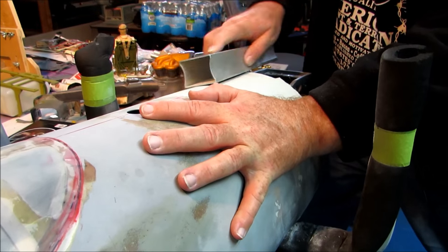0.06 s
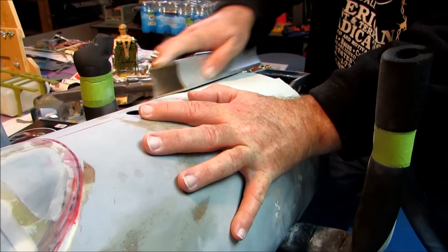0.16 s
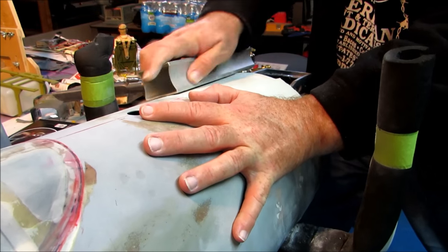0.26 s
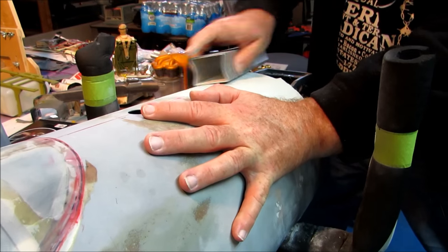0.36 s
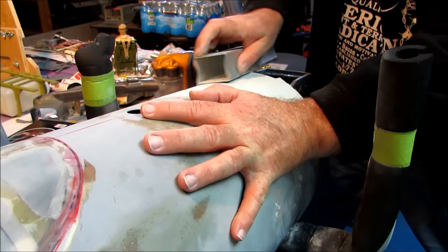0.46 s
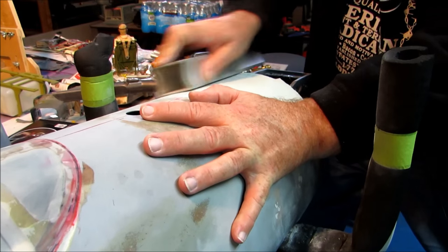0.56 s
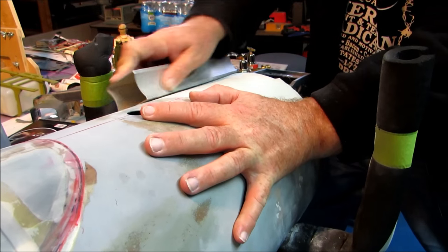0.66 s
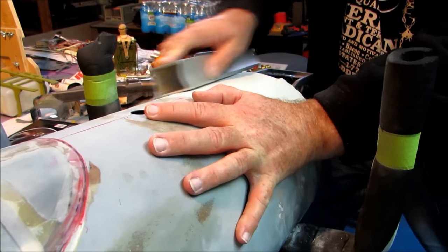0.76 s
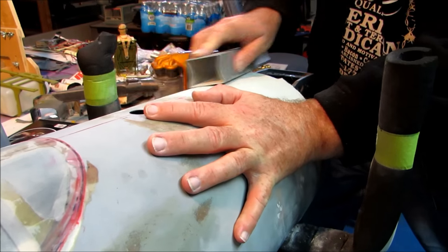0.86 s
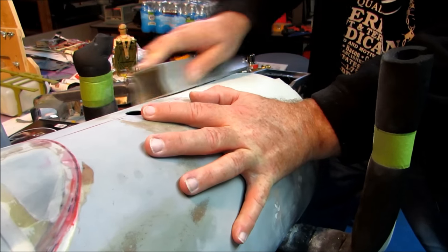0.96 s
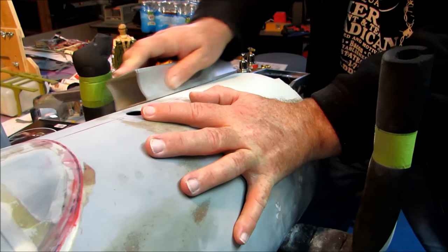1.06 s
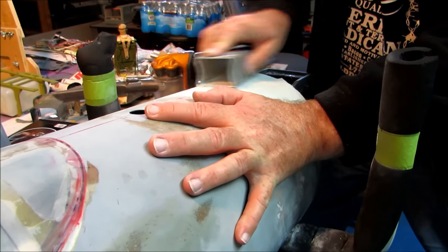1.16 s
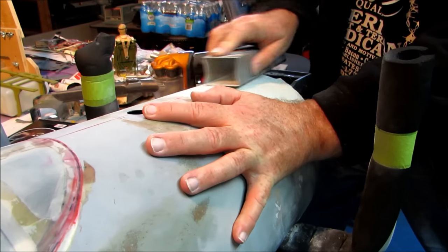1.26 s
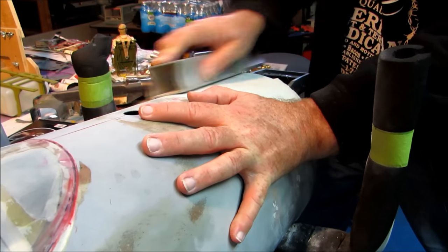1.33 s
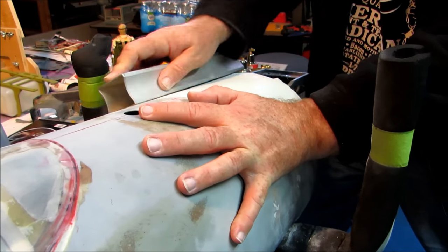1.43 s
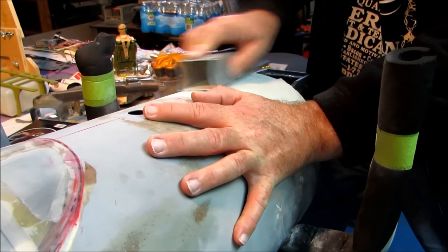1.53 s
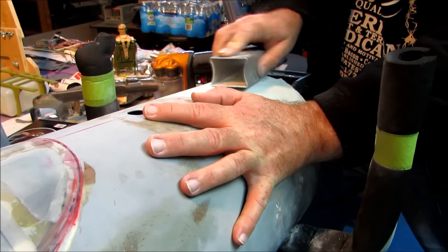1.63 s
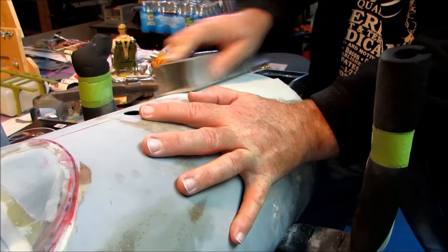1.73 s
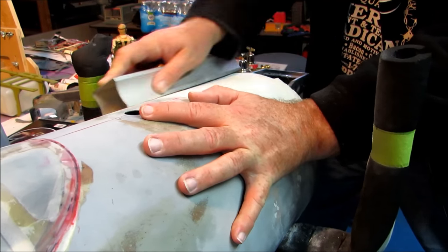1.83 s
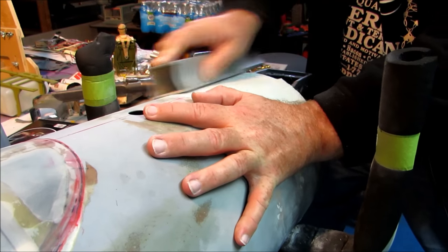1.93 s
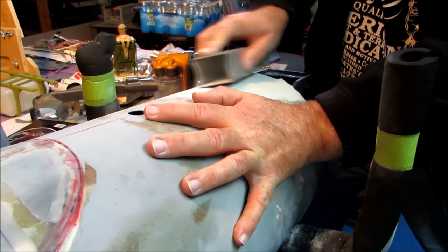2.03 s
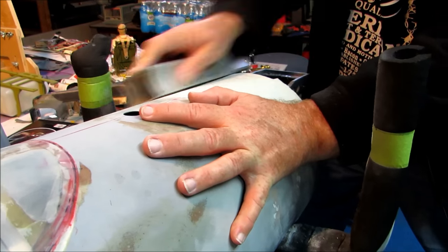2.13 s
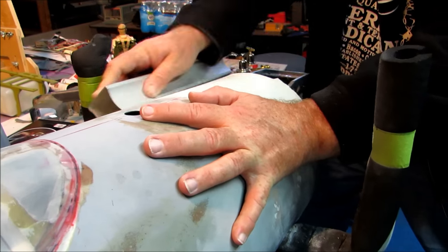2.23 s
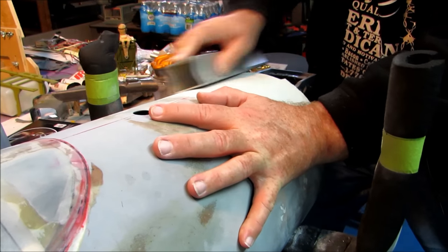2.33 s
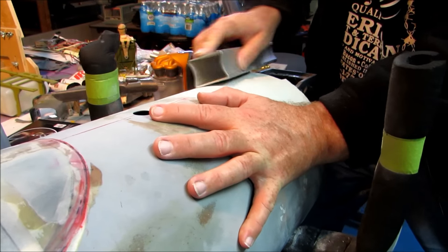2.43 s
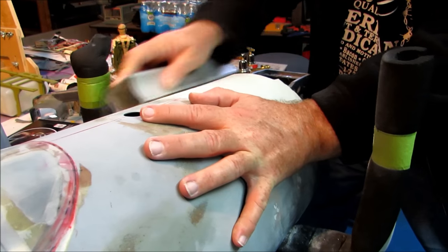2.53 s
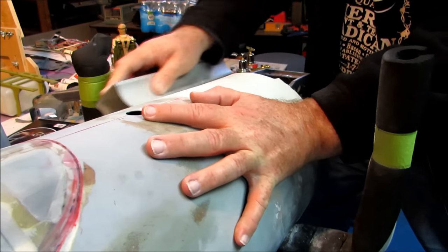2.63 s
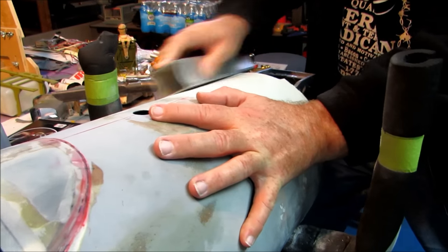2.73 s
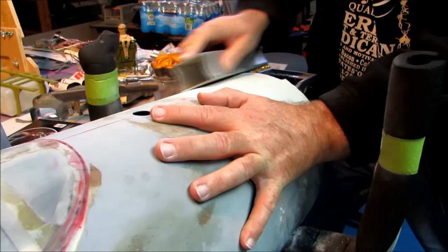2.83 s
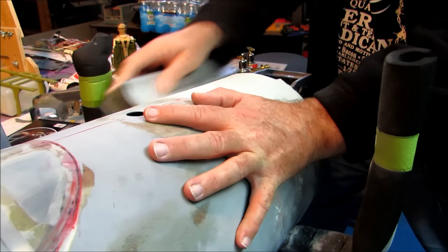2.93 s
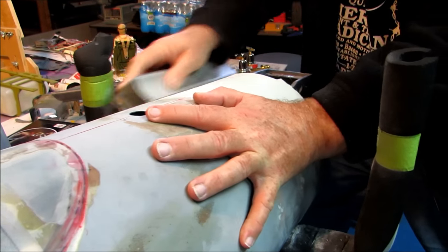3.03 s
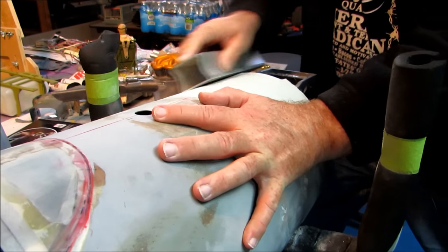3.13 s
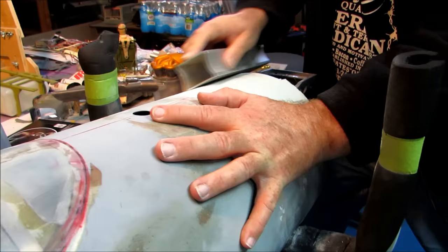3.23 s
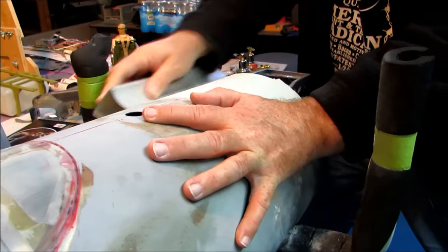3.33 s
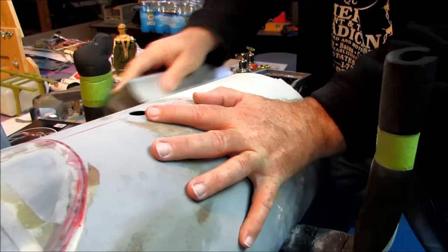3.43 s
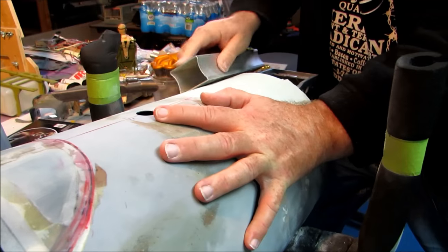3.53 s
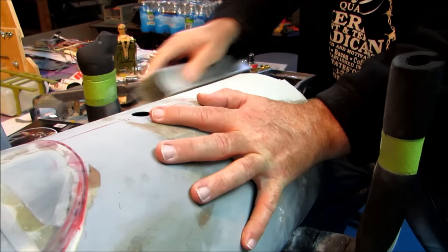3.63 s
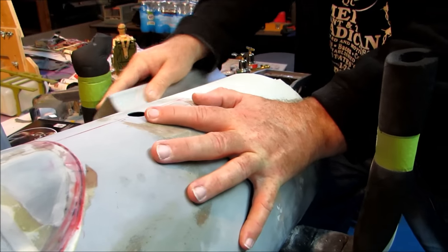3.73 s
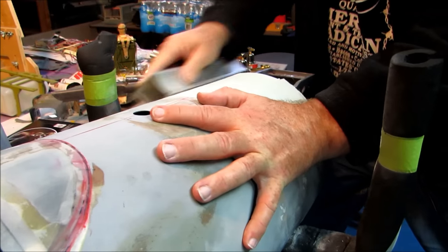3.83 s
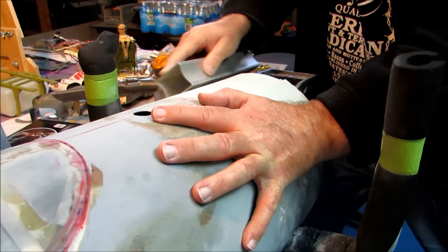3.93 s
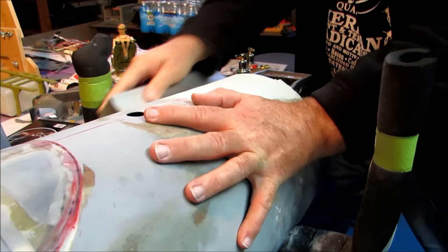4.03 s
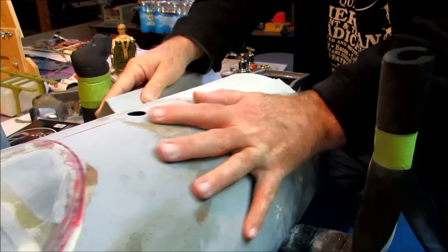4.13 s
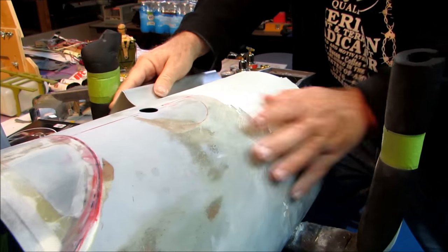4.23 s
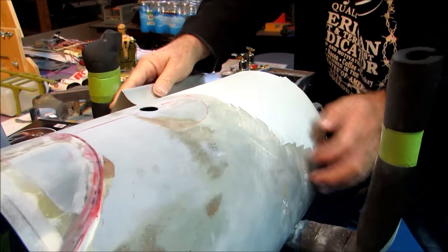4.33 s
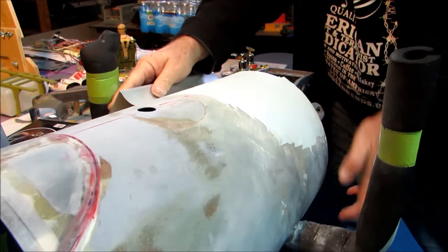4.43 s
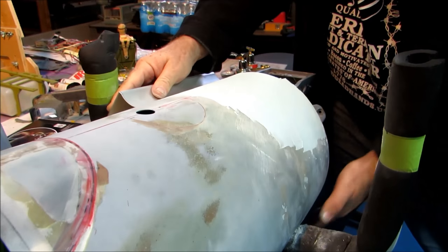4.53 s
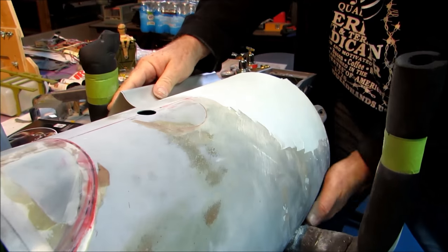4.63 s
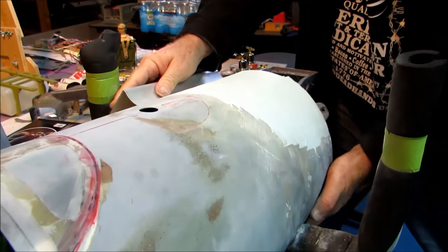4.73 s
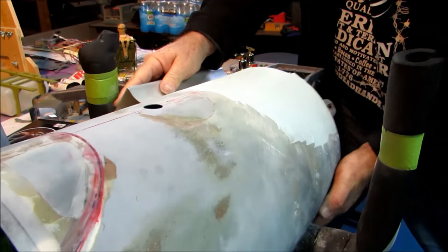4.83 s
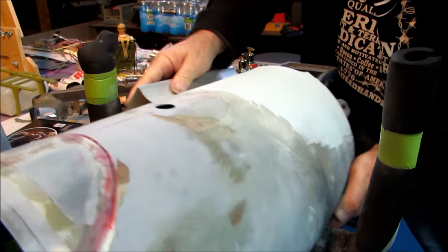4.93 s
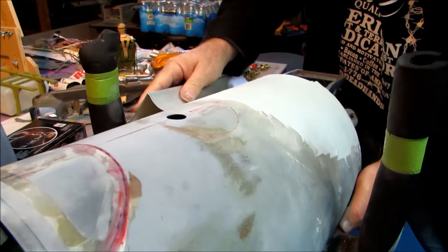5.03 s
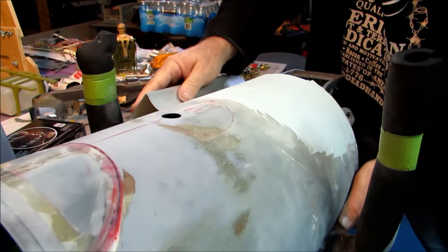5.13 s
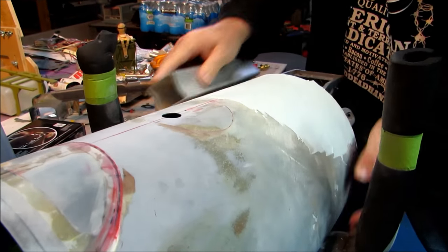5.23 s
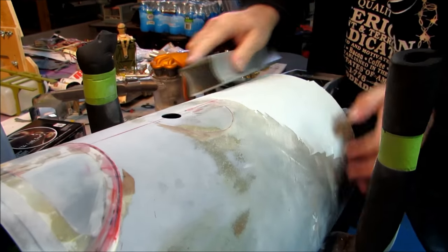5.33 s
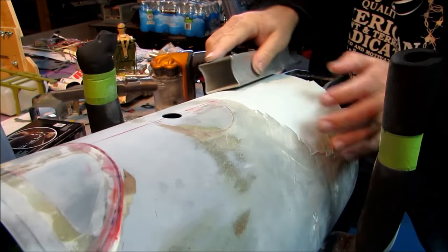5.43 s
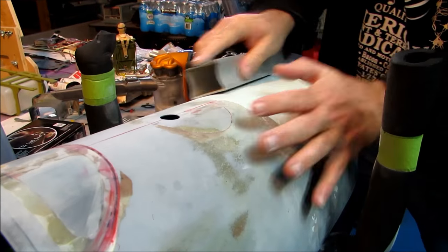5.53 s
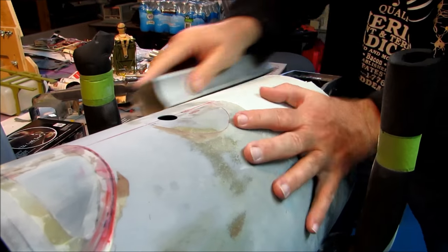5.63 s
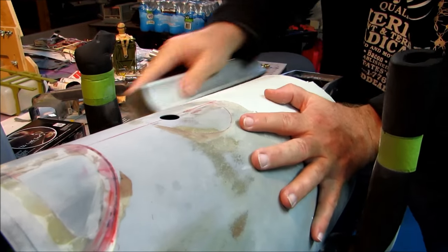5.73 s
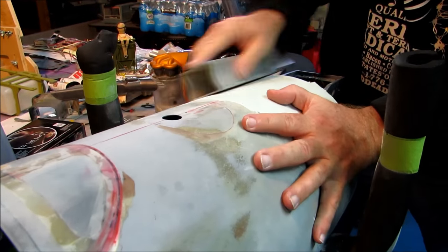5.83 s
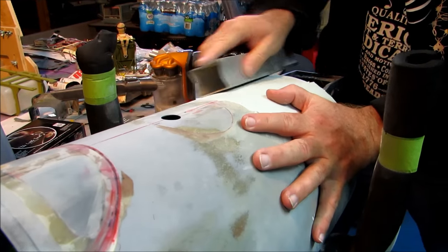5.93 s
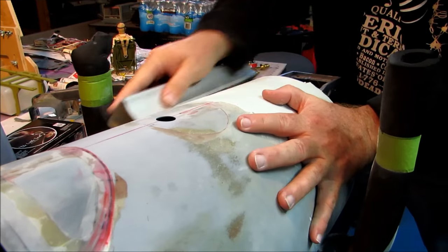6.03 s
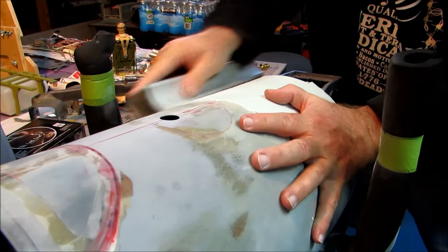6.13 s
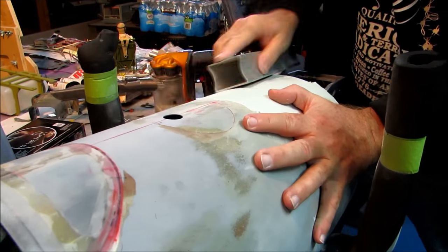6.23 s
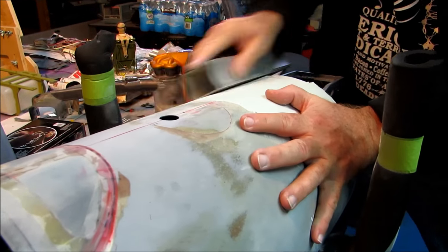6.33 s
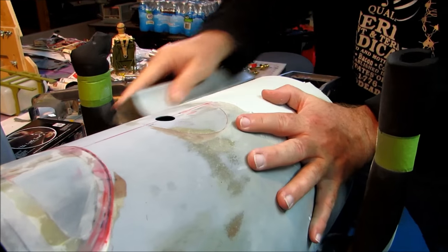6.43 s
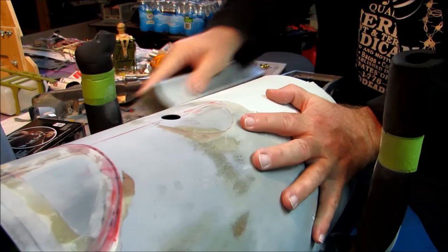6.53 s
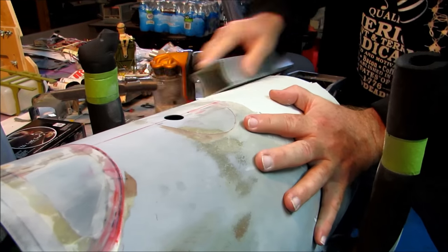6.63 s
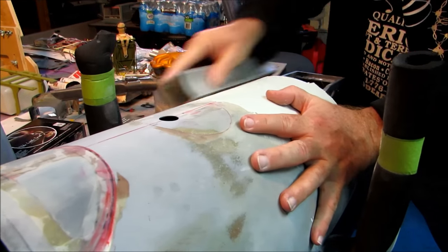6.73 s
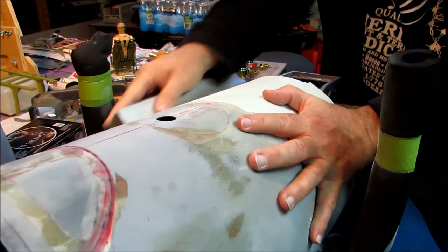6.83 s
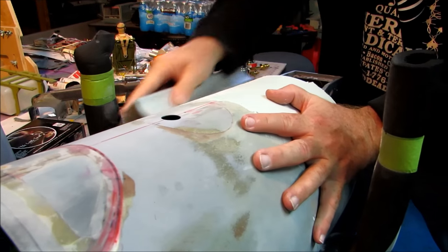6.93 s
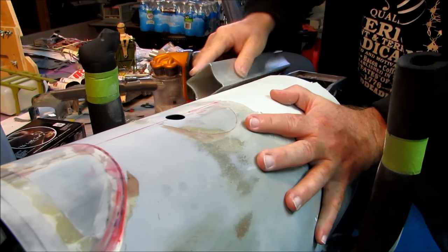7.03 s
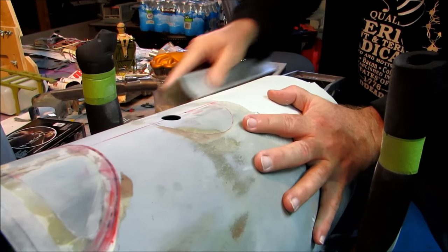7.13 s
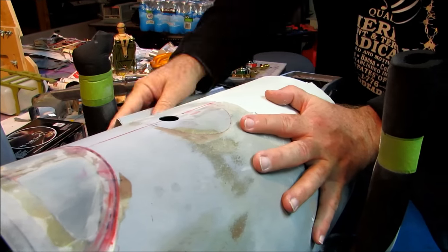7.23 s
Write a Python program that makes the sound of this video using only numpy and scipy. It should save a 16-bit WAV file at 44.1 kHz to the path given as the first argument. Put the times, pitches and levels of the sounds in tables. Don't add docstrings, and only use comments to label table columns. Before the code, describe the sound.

Fast, dry, even sanding strokes on a hollow shell, with a quiet shuffling break and a hollow knock before the scrubbing resumes in a workshop.

```python
import sys
import numpy as np
from scipy import signal
from scipy.fft import rfft, irfft, next_fast_len
from scipy.io import wavfile
from scipy.ndimage import uniform_filter1d

SR = 44100
rng = np.random.default_rng(int(sys.argv[2]) if len(sys.argv) > 2 else 0)


def output_pcm(signal):
    pcm = np.clip(np.atleast_2d(signal).T, -1, 1) * 32767
    wavfile.write(sys.argv[1], SR, np.round(pcm).astype(np.int16))


def field_ratio(decibels):
    return 10 ** (np.asarray(decibels, dtype=float) / 20)


N = 320607

# (turn time [s], speed [dB], pressure [dB], lean toward the end [dB], rest level at the turn [dB])
PUSHES = [(-0.1, -20.5, -22.5, 7, -30), (0.303, -20.5, -22, 4, -43.5), (0.732, -19, -21, -7.5, -39),
          (1.088, -19.5, -20.5, -10.5, -33.5), (1.49, -20, -20.5, -7, -32), (1.887, -19, -18.5, -6.5, -31),
          (2.271, -18.5, -19, -1, -33), (2.669, -19.5, -21, -4.5, -37.5), (3.045, -19.5, -21, 4.5, -38),
          (3.429, -19.5, -21.5, 2.5, -38), (3.797, -21, -22.5, -6.5, -36), (5.772, -17, -19.5, -5, -33),
          (6.138, -17.5, -21, -6.5, -35.5), (6.539, -17, -20, 1.5, -35.5), (6.93, -19, -20.5, -4.5, -36)]
# (turn time [s], speed [dB], pressure [dB], lean toward the end [dB], rest level at the turn [dB])
PULLS = [(0.089, -23.5, -22.5, 3, -38.5), (0.484, -17, -18.5, 2.5, -36), (0.901, -17.5, -19, 8, -35),
         (1.277, -19, -18, 9, -32), (1.676, -18, -17, 11, -34.5), (2.071, -17, -17, 5.5, -36),
         (2.463, -16.5, -18, -6, -37.5), (2.852, -17, -19.5, -1.5, -39), (3.234, -17.5, -20, 0, -39),
         (3.605, -17.5, -20, 8, -37.5), (3.97, -18.5, -19, 5, -39.5), (5.536, -16.5, -18, 4, -47.5),
         (5.953, -15.5, -19, 2, -39.5), (6.336, -16, -19.5, 4, -41), (6.728, -16, -18, 8, -36),
         (7.128, -19, -19.5, 13, -37)]
# (time [s], peak [dB], ring [Hz], length [s])
BUMPS = [(0.379, -21.5, 237, 0.034), (0.637, -25, 248, 0.035), (0.782, -18, 292, 0.033),
         (1.015, -20.5, 274, 0.018), (1.16, -21, 400, .03), (1.33, -21, 540, .03), (1.22, -24, 540, .03),
         (1.129, -21.5, 269, 0.048), (1.29, -28.5, 260, 0.03), (1.41, -15.5, 250, 0.022),
         (1.546, -14.5, 250, 0.024), (1.75, -21, 780, .025), (1.787, -13, 259, 0.024),
         (1.82, -20, 742, 0.027), (2.09, -25.5, 264, 0.033), (2.338, -26, 255, 0.029),
         (2.607, -24, 257, 0.021), (2.63, -29.5, 165, 0.032), (3.751, -17, 312, 0.016),
         (3.86, -22, 250, 0.037), (4.016, -20.5, 250, 0.026), (4.092, -15.5, 313, 0.037),
         (4.228, -24.5, 358, 0.024), (4.662, -36.5, 250, 0.028), (5.113, -41.5, 257, 0.037),
         (5.421, -35, 260, 0.02), (5.907, -25, 274, 0.023), (5.988, -21, 288, 0.017),
         (6.373, -29, 277, 0.03), (6.954, -19, 310, 0.025), (7.21, -20, 780, .025),
         (7.18, -27.5, 169, 0.022), (7.25, -16, 480, 0.02), (7.237, -17, 283, 0.03)]
# (time [s], peak [dB], ring [Hz], length [s])
SNAGS = [(0.533, -21, 1100, 0.018), (1.05, -16, 791, 0.018), (1.105, -18, 956, 0.018),
         (1.407, -12, 767, 0.018), (1.508, -17, 673, 0.018), (1.788, -15, 1090, 0.018),
         (1.899, -17, 912, 0.018), (1.976, -15, 1080, 0.018), (2.089, -23, 1080, 0.018),
         (2.408, -21, 794, 0.018), (2.493, -19, 980, 0.018), (2.595, -19, 923, 0.018),
         (2.873, -22, 991, 0.018), (2.981, -16, 842, 0.018), (3.161, -20, 982, 0.018),
         (3.251, -25, 991, 0.018), (3.75, -17, 1080, 0.018), (3.861, -21, 1030, 0.018),
         (3.994, -22, 1000, 0.018), (4.088, -17, 966, 0.018),
         (5.687, -15, 840, 0.018), (5.799, -16, 1020, 0.018), (6.073, -19, 746, 0.018),
              (6.167, -19, 1050, 0.018), (6.45, -19, 764, 0.018), (6.807, -17, 829, 0.018),
              (6.878, -16, 853, 0.018), (6.946, -19, 910, 0.018), (7.14, -26, 910, 0.018)]
# (time [s], peak [dB])
BITES = [(1.1019, -24), (1.509, -11.5), (1.9061, -24), (2.0892, -18), (2.4904, -16), (4.3495, -48),
         (4.5964, -47), (5.1961, -37), (6.9426, -18), (7.1382, -23)]
# (time [s], looseness [dB])
SLACK = [(0, 6.5), (.4, 4), (1.2, 0.5), (2, -0.5), (3.2, -2), (4.2, 3), (5.5, -1.5), (6.3, -0.5),
         (7.27, -3.5)]
# (frequency [Hz], level [dB])
PAPER = [(2500, -46), (3600, -19), (4400, -1.5), (7000, -1.5), (9500, -2.5), (12500, -2), (13400, -7),
         (14400, -10), (14700, -17), (15400, -36)]
# (frequency [Hz], width [Hz], level [dB])
BLOCK = [(1064, 110, -1), (1333, 524, -5.5), (1623, 258, 0.5), (1984, 406, -2), (2400, 350, 0),
         (2737, 272, -1.5), (3443, 654, -6.5)]
# (frequency [Hz], width [Hz], level [dB])
SHELL = [(250, 50, -0.5), (345, 95, 0), (448, 65, 2), (537, 58, 2), (707, 121, 1.5), (808, 91, 2),
         (937, 156, 0)]
# (frequency [Hz], width [Hz], level [dB])
SWAY_MODES = [(96.4, 23, -11), (173.4, 21, -2.5)]
# (frequency [Hz], gain [dB])
BASS_CUT = [(30, -26), (70, -5), (100, -5.5), (122, -6.5), (170, 0.5), (200, -3.5), (230, 0)]
# (time [s], 20 dB decay [s], block [dB], paper re block [dB], shell re block [dB])
TOUCHES = [(4.207, 0.12, -25, -3.5, -6), (4.346, 0.07, -51, 11, 1), (4.659, 0.07, -40, -6, -5),
           (4.745, 0.2, -44, -14, -3.5), (5.197, 0.1, -39, -13, -4), (5.42, 0.3, -29, -20.5, -3.5)]
# (middle [s], half length [s], block [dB], paper re block [dB], shell re block [dB])
RUBS = [(4.28, .025, -35, -8, -6), (4.595, .02, -52, -12, -6), (4.19, .03, -32.5, -8, -3),
        (4.368, 0.029, -51, 9, 0), (5.02, .06, -58, 2, -3), (4.866, .11, -42, -4, -9),
        (5.102, .05, -56, -12, 5.5), (5.2, .07, -51, 2, -2), (5.228, 0.042, -32.5, -19, -6),
        (5.475, 0.026, -33, -29, 7)]
# (time [s], peak [dB], ring [Hz], length [s])
TAPS = [(4.208, -24, 1550, .012), (4.212, -30, 3400, .012), (4.438, -48, 530, .015),
        (4.695, -40, 447, .025), (4.745, -42, 1600, .015), (4.89, -44, 1130, .015), (5.181, -38, 396, .012),
        (5.197, -34, 1090, .01), (5.223, -29, 1090, .01), (5.224, -35, 2400, .015), (5.42, -27, 813, .006),
        (5.491, -19, 310, .014)]
# (frequency [Hz], width [Hz], level [dB])
SCUFF = [(700, 110, -5), (880, 120, -3), (1110, 160, -1), (1320, 110, -3), (1560, 180, 0), (2050, 260, -5),
         (2420, 200, -2.5), (2950, 400, -9), (3450, 500, -11)]
# (frequency [Hz], level [dB], t60 [s])
KNOCK = [(169, -9, 0.09), (269, -10, 0.15), (352, -10.5, 0.15), (453, -9, 0.08), (550, 7, 0.087),
         (650, -15, .06), (770, -16, .08), (1105, -7, 0.067), (1570, -6, .04), (2595, -24, .03)]
# (frequency [Hz], t60 [s])
WALLS = [(150, 0.44), (1000, 0.11), (4000, 0.13), (12000, 0.072)]
# (frequency [Hz], level [dB], likeness [0-1])
PORTS = [(45, -6.5, 0.3), (175, 0.5, .96), (260, 1, 0.9), (370, -0.5, 0.9), (520, -6, 0.9), (640, -22, 0),
         (758, -5, 0.5), (860, -4.5, 0.95), (1280, -5, 0.5), (1580, -8, 0.27), (2340, -14.5, 0.5),
         (3120, -8.5, 0.21), (4250, -9, 0), (4800, -6.5, 0.55), (5600, -11, 0), (6800, -6, 0.48),
         (7250, -11, 0), (8000, -16.5, 0), (10000, -25.5, 0), (13100, -91, .75), (14600, -90, .3)]
# (frequency [Hz], phase lag [rad])
LATE = [(170, 0), (370, 1.2), (560, 2.4), (690, 5.6), (820, 6.4), (1080, 7.9), (1270, 8.6), (1440, 6.8),
        (2300, 9.2), (2750, 14.5), (3100, 15.5), (4000, 17.6), (4700, 18.6), (5400, 22.2), (6900, 26),
        (7400, 28.2), (8100, 32.5), (10400, 36.2), (14600, 36.5)]
# (frequency [Hz], level [dB])
AIR = [(20, -40), (60, -7), (120, -8), (250, -6), (450, -5.5), (900, -11), (1400, -8.5), (2200, -17),
       (3400, -17), (4500, -28), (8000, -28), (12000, -33.5), (15000, -49)]
# (frequency [Hz], width [Hz], level [dB])
FAN = [(253, 31, -5), (533, 45, 0.5), (1075, 70, -7), (1480, 110, -12)]
# (frequency [Hz], left-right likeness [-1 to 1])
OPPOSED = [(60, 0.038), (500, -0.84), (1100, -0.64), (2000, -0.37), (4000, 0)]
# (frequency [Hz], width [Hz], depth [0-1])
NOTCHES = [(3925, 280, .24), (3928, 95, .7), (7868, 120, .93)]

PAUSE_S = 4.17, 5.53
SPEEDING_UP, SLOWING_DOWN = [0.17, 0.21], [0.21, 0.25]
RISE_LINGER_PER_DB, FALL_LINGER_PER_DB, USUAL_REST_DB = 0.0176, 0.0332, -36
RESTART_SLOWER = 1.21
HISS_EARLY_DB, HISS_LATE_DB, HISS_REST_DB = [-2.5, -2.5], [-2, -2], -0.5
SHELL_DB, SHELL_REST_DB = [-8, -8.5], -0.2
HISS_LEAN, BLOCK_LEAN = 0.066, 0.42
HISS_REST_SHARE = 0.067
LAG, STICK_S, STILL_DB = [1.115, 0.96, 0.98], [0.0082, 0.0015, 0.0021], [-63, -63, -59]
LIFT_S = 0.04
TOUCH_RISE_S = 0.0015
SNAG_DB = -2.5
BOOM_HZ, BOOM_SHARE = 324, 0.9
TURN_HUSH = 0.3
SWAY_DB, SWAY_BUMP_DB, SWAY_S = -14, -10, 0.042
KNOCK_S, KNOCK_DB, TICK_DB = 5.467, -13.5, -30
BOUNCE_S, BOUNCE_DB = 0.01164, -7
TRAVEL_S, STROKES_PER_S = 0.0007, 2.58
RUMBLE_DB, AIR_DB, FAN_DB = -61.5, -50, -48
TOP_HZ, TOP_HZ_PER_DB = [14050, 14650], 60


def evened(x):
    return x / np.sqrt(np.mean(x ** 2) + 1e-20)


def read(points, hz, axis=1):
    table = np.transpose(points)
    return np.interp(np.log(hz + 1), np.log(table[0] + 1), table[axis])


def shaped(x, gain):
    size = next_fast_len(N)
    spectrum = rfft(x, size) * gain(np.fft.rfftfreq(size, 1 / SR))
    return irfft(spectrum, size)[..., :N]


def modes(table):
    def gain(hz):
        total = 0
        for k, (f, width, db) in enumerate(table):
            damping = 1j * width * hz
            total = total + (-1) ** k * field_ratio(db) * damping / (f * f - hz * hz + damping)
        return total
    return gain


def through(drive, level, gain):
    mean_power = np.mean(abs(gain(np.linspace(1, SR / 2, num=4096))) ** 2)
    return shaped(drive * level, gain) / np.sqrt(mean_power)


def add(mix, s, sound):
    part = mix[round(s * SR):][:len(sound)]
    part += sound[:len(part)]


def grit(per_s, spread_db):
    size = field_ratio(spread_db * np.minimum(rng.exponential(1, (2, N)), 5))
    sign = rng.choice([-1., 1.], (2, N))
    return evened(size * sign * (rng.random((2, N)) < per_s / SR))


def patchy(x, patchy_db, flicker_db):
    z = signal.stft(x, nperseg=512, noverlap=256)[2]
    field = rng.standard_normal(z.shape[1:])
    patches = evened(uniform_filter1d(uniform_filter1d(field, size=4, axis=0), size=8, axis=1))
    flicker = evened(field.mean(0))
    z = z * field_ratio(patchy_db * patches + flicker_db * flicker)
    return signal.istft(z, nperseg=512, noverlap=256)[1][:, :N]


def stroking(t):
    rows = np.array(sorted([(*r, 0) for r in PUSHES] + [(*r, 1) for r in PULLS]))
    start, speed, pressure, lean, rest, way = rows.T
    pick = lambda pair: np.take(pair, way.astype(int))
    end = start + np.minimum(np.diff(start, append=9), 0.24)
    end[(start < PAUSE_S[0]) & (end > PAUSE_S[0])] = PAUSE_S[0]

    rise = pick(SPEEDING_UP) * (end - start)
    fall = pick(SLOWING_DOWN) * (end - start)
    rise = rise * (1 + RISE_LINGER_PER_DB * (USUAL_REST_DB - rest))
    fall = fall * (1 + FALL_LINGER_PER_DB * (USUAL_REST_DB - np.roll(rest, shift=-1)))
    rise[np.searchsorted(start, PAUSE_S[0])] *= RESTART_SLOWER

    paper_rest = rest + HISS_REST_DB + HISS_REST_SHARE * (rest - USUAL_REST_DB)
    paper_tilt, block_tilt = HISS_LEAN * lean / 2, BLOCK_LEAN * lean / 2
    shell = pressure + pick(SHELL_DB)
    layers = [
        (paper_rest, speed + pick(HISS_EARLY_DB) - paper_tilt, speed,
         speed + pick(HISS_LATE_DB) + paper_tilt),
        (rest, pressure - block_tilt, pressure, pressure + block_tilt),
        (rest + SHELL_REST_DB, shell - lean / 2, shell, shell + lean / 2)]
    stop_s = [PAUSE_S[0], PAUSE_S[0] + LIFT_S, PAUSE_S[1] - LIFT_S]
    gains = []
    for db, still_db, lag, stick_s in zip(layers, STILL_DB, LAG, STICK_S):
        up, down = start + lag * rise, end - lag * fall
        free = start + stick_s
        grip_s = free + 0.32 * lag * rise
        grip_db = db[0] + 0.66 * (db[1] - db[0])
        stop_db = [db[0].mean() - 1.5, still_db, still_db]
        s = np.concatenate([free, up, (up + down) / 2, down, grip_s, stop_s])
        level_db = np.concatenate([*db, grip_db, stop_db])
        order = np.argsort(s)
        gains.append(field_ratio(np.interp(t, s[order], level_db[order])))
    return np.array(gains)


def contacts():
    short = np.arange(SR // 4) / SR
    thuds, jolts, bites = np.zeros((3, N))
    snags = [(s, db + SNAG_DB, hz, length) for s, db, hz, length in SNAGS]
    for s, db, hz, length in [*BUMPS, *TAPS, *snags]:
        u = short / max(length, 0.004)
        add(thuds, s, field_ratio(db) * 5 * u * np.exp(-3 * u) * np.sin(2 * np.pi * hz * short))
    for s, db, _, length in BUMPS:
        u = short / max(length, 0.004)
        add(jolts, s, field_ratio(db) * 4 * u * np.exp(-3 * u))
    for s, db in BITES:
        add(bites, s, field_ratio(db - 4.0 - 60 * short / 0.1))
    return thuds, jolts, bites


def paper_hiss(grains, paper):
    tearing = patchy(grains, 2.5, 0.9)
    colour = lambda hz: field_ratio(read(PAPER, hz))
    dull = lambda hz: 1 / (1 + (hz / 7500) ** 4)
    fast = np.clip(paper / field_ratio(-20.0), 0.008, 2) ** 0.37
    low = shaped(through(tearing, paper, colour), dull)
    high = shaped(through(tearing, paper * fast, colour), lambda hz: 1 - dull(hz))
    return low + high


def block_ring(grains, block, paused):
    rubbing = patchy(grains, 2.5, 0.62)
    return through(rubbing, block * ~paused, modes(BLOCK)) + through(rubbing, block * paused, modes(SCUFF))


def shell_drum(drive, paused, slack_db):
    coarse = patchy(grit(5000, 2.6), 2.0, 1.4)
    drum = through(coarse, drive, modes(SHELL))
    boom = shaped(drum, lambda hz: 1 / (1 + (hz / BOOM_HZ) ** 6))
    hush = np.where(paused, 1, np.clip(drive / field_ratio(-32.0), 0.05, 1) ** TURN_HUSH)
    return (drum - boom) * hush + boom * field_ratio(BOOM_SHARE * slack_db - 1.5)


def fuselage_sway(grains, shell, jolts, slack_db):
    after_bump = uniform_filter1d(jolts, size=round(SWAY_S * SR))
    rocking = np.hypot(field_ratio(SWAY_DB) * shell, field_ratio(SWAY_BUMP_DB) * after_bump)
    return through(grains, rocking * field_ratio(slack_db), modes(SWAY_MODES))


def sanding():
    t = np.arange(N) / SR
    paper, block, shell = np.hypot(stroking(t), shuffling(t))
    thuds, jolts, bites = contacts()
    paused = (t > PAUSE_S[0]) & (t < PAUSE_S[1])
    slack_db = np.interp(t, *np.transpose(SLACK))
    grains = grit(14000, 2.45)
    hiss = paper_hiss(grains, np.hypot(paper, 0.43 * bites))
    ring = block_ring(grains, np.hypot(block, bites), paused)
    drum = shell_drum(np.hypot(shell, jolts), paused, slack_db)
    sway = fuselage_sway(grains, shell, jolts, slack_db)
    return hiss + ring + drum + thuds * np.c_[[1, 0.3]] + sway


def walls(x):
    taps = np.zeros((2, SR // 2))
    at = np.arange(200, SR // 2 - 20, 20) + rng.integers(0, 20, (2, (SR // 2 - 201) // 20))
    np.put_along_axis(taps, at, rng.choice([-1., 1.], at.shape), 1)
    hz, t, z = signal.stft(taps, SR, nperseg=256)
    decay = field_ratio(-60 * t / read(WALLS, hz)[:, None])
    tail = signal.istft(z * decay, SR, nperseg=256)[1]
    s = np.arange(N) / SR
    path_s = TRAVEL_S * (2 + np.sin(2 * np.pi * STROKES_PER_S * s) + np.sin(s))
    x = np.array([np.interp(s - path_s, s, side) for side in x])
    return signal.fftconvolve(x, tail / np.linalg.norm(tail[0]), axes=1)[:, :N]


def ports(pair):
    level = lambda hz: field_ratio(read(PORTS, hz))
    same = lambda hz: np.clip(read(PORTS, hz, axis=2), 0, 1)
    near = shaped(pair[0], lambda hz: level(hz) * same(hz) * np.exp(-1j * read(LATE, hz)))
    other = shaped(pair[1], lambda hz: level(hz) * np.sqrt(1 - same(hz) ** 2))
    return np.array([near + other, pair[0]])


def bench():
    t = np.arange(N) / SR
    working = 1 - 1.1 * np.interp(t, [4.2, 4.4, 5.35, 5.5], [0, 1, 1, 0])
    slow = shaped(rng.standard_normal(N), lambda hz: 1 / (1 + (hz / 1.9) ** 4))
    lumps = field_ratio(4.1 * evened(slow))
    noise = shaped(rng.standard_normal((2, N)), lambda hz: (0.3 + hz / 75) / (1 + (hz / 85) ** 6))
    return field_ratio(RUMBLE_DB) * evened(noise * lumps) * working


def workshop():
    noise = patchy(rng.standard_normal((2, N)), 1.2, 0.44)
    air = field_ratio(AIR_DB) * evened(shaped(noise, lambda hz: field_ratio(read(AIR, hz))))
    air += field_ratio(FAN_DB) * evened(shaped(noise, modes(FAN)))
    same = lambda hz: np.clip(read(OPPOSED, hz), -1, 1)
    right = shaped(air[0], same) + shaped(air[1], lambda hz: np.sqrt(1 - same(hz) ** 2))
    return np.array([air[0], right * field_ratio(-2.0)])


def shuffling(t):
    power = np.zeros((3, N))
    for s, length, db, paper_db, shell_db in TOUCHES:
        fall_db = 20 * np.maximum((s - t) / TOUCH_RISE_S, (t - s) / length)
        power += field_ratio(db + np.c_[[paper_db, 0, shell_db]] - np.minimum(fall_db, 99)) ** 2
    for s, length, db, paper_db, shell_db in RUBS:
        fall_db = 20 * ((t - s) / length) ** 2
        power += field_ratio(db + np.c_[[paper_db, 0, shell_db]] - np.minimum(fall_db, 99)) ** 2
    return np.sqrt(power)


def knock():
    t = np.arange(SR // 2) / SR
    ring = sum(field_ratio(db - 60 * t / t60) * np.sin(2 * np.pi * hz * t) for hz, db, t60 in KNOCK)
    ring = field_ratio(KNOCK_DB) * ring * (1 - np.exp(-t / 0.0008))
    blow, tick = np.zeros((2, N))
    add(blow, KNOCK_S, ring)
    add(blow, KNOCK_S + BOUNCE_S, field_ratio(BOUNCE_DB) * ring)
    add(tick, KNOCK_S + 0.0006, field_ratio(TICK_DB - 60 * t / 0.012))
    thin = lambda hz: np.exp(-((hz - 6500) / 4200) ** 2)
    return blow * np.c_[[1, 0.3]] + shaped(2.3 * tick * rng.standard_normal((2, N)), thin)


def scene():
    work = shaped(sanding() + knock(), lambda hz: field_ratio(read(BASS_CUT, hz)))
    return ports(work + field_ratio(-14.0) * walls(work)) + bench() + workshop()


def notched(x):
    def gain(hz):
        dips = [np.clip(depth, 0, 1) / (1 + (2 * (hz - f) / width) ** 2) for f, width, depth in NOTCHES]
        return np.prod([1 - dip for dip in dips], axis=0)
    return shaped(x, gain)


def trimmed(x):
    hz, _, z = signal.stft(x, SR, nperseg=2048, noverlap=1024)
    loud_db = 10 * np.log10((abs(z) ** 2).sum(1) + 1e-12)
    quieter_db = np.clip(uniform_filter1d(loud_db, size=9) - np.roll(loud_db, 1, axis=1), -6, 12)
    waver_hz = 120 * uniform_filter1d(rng.standard_normal(quieter_db.shape), size=2)
    top_hz = np.c_[TOP_HZ] + TOP_HZ_PER_DB * quieter_db + waver_hz
    keep = hz[:, None] < np.round(top_hz / 172)[:, None] * 172
    return signal.istft(z * keep, nperseg=2048, noverlap=1024)[1][:, :N]


def roll_off(x):
    return signal.sosfilt(signal.butter(12, 15240, fs=SR, output="sos"), x)


def record(dry):
    limited = 1.56 * np.tanh(notched(dry) / 1.64)
    return roll_off(trimmed(limited))


dry = scene()
out = record(dry)
output_pcm(out)
```